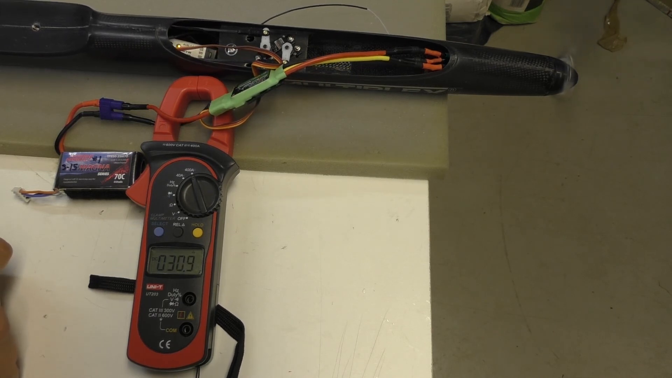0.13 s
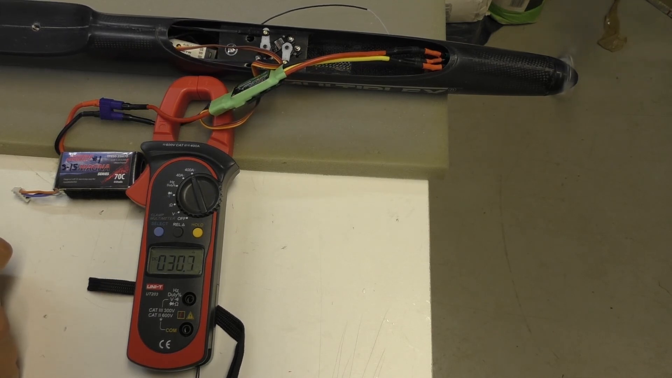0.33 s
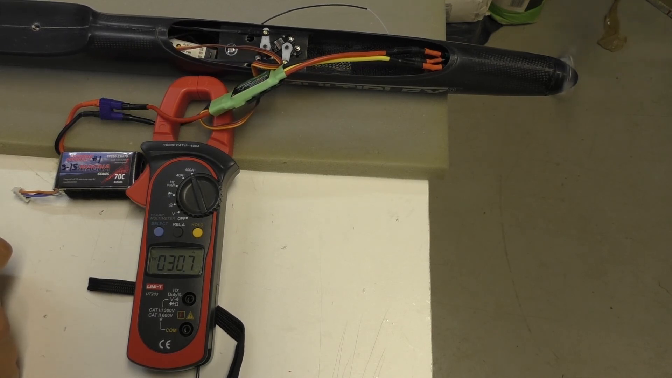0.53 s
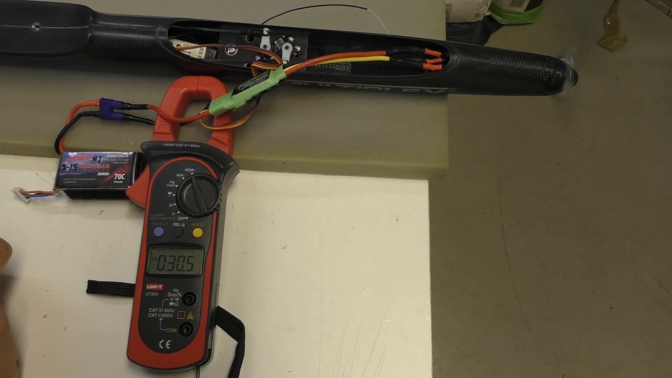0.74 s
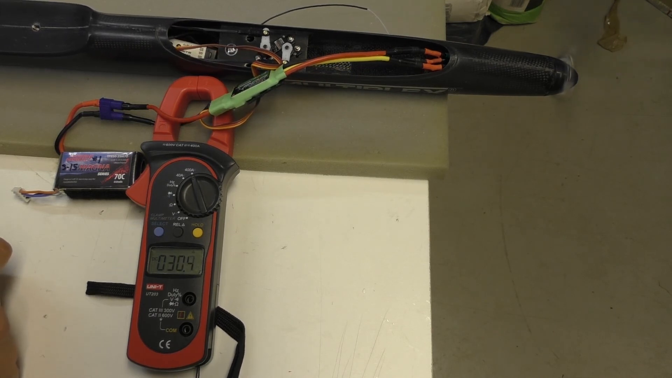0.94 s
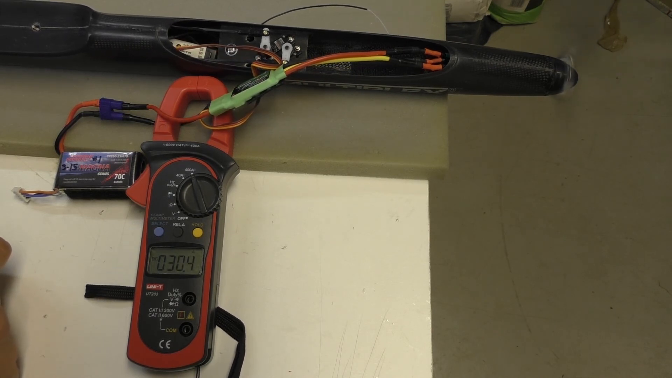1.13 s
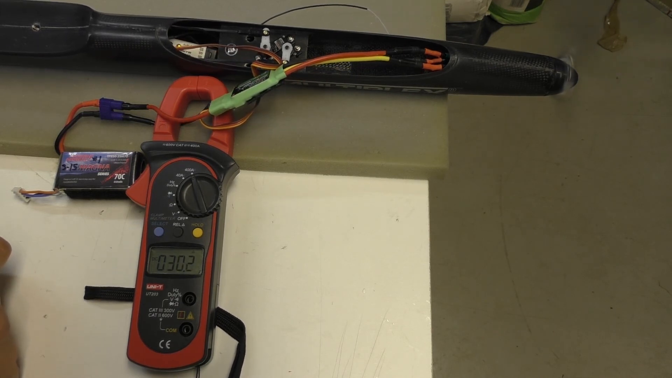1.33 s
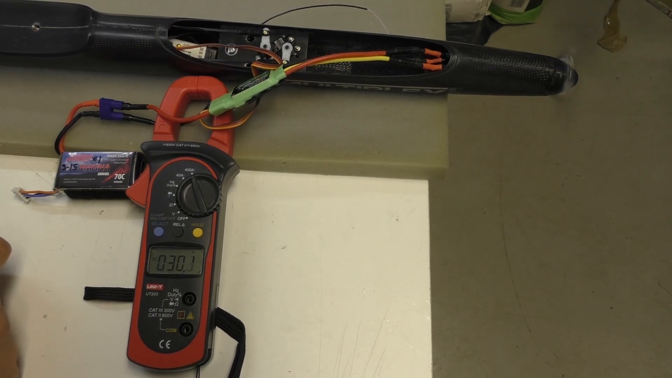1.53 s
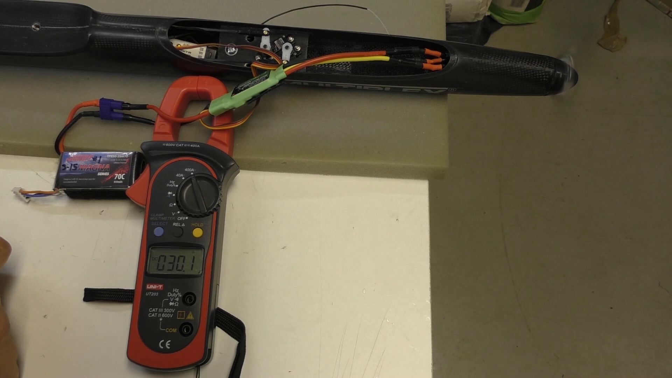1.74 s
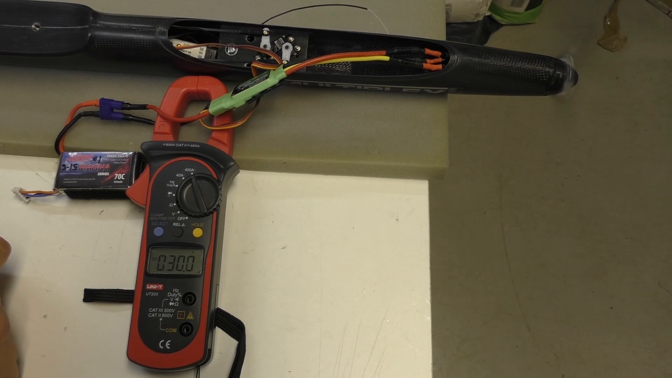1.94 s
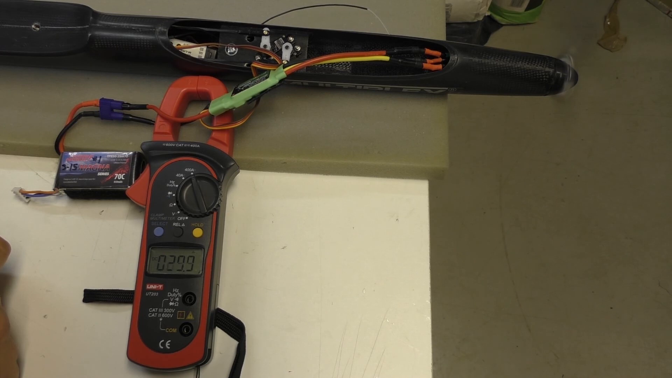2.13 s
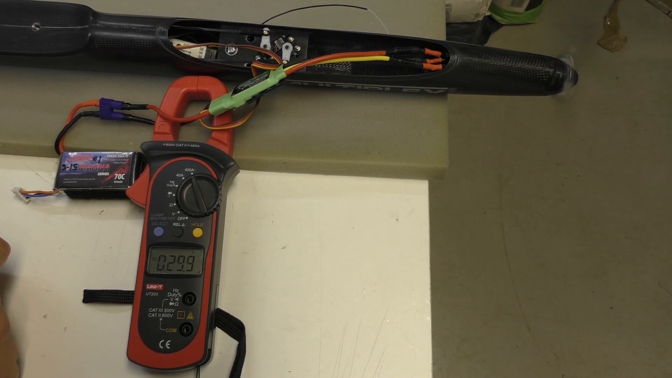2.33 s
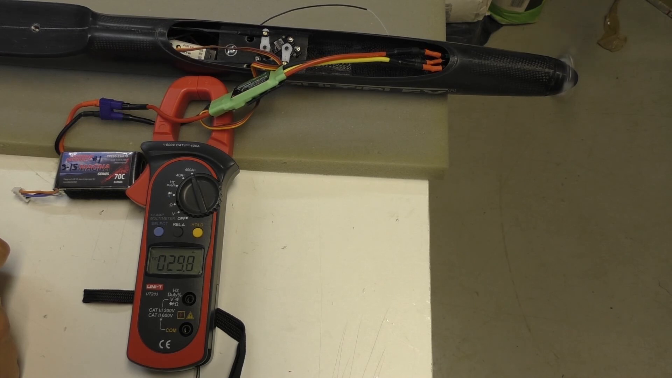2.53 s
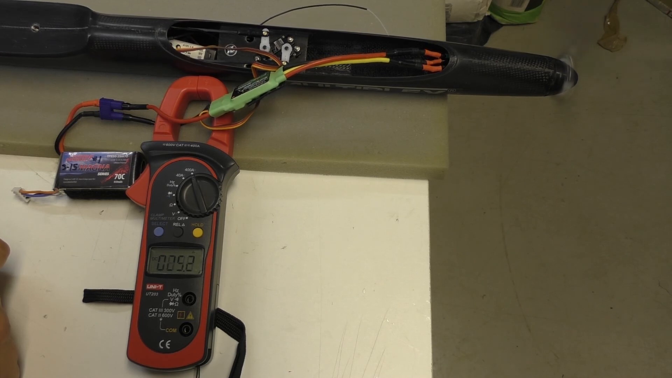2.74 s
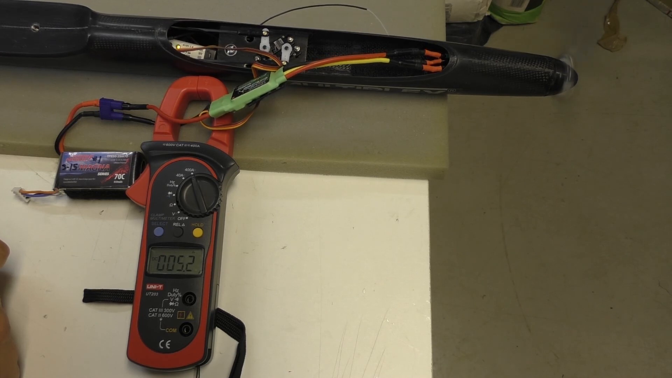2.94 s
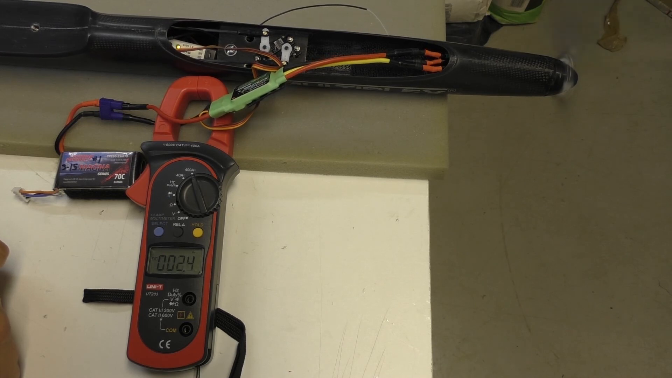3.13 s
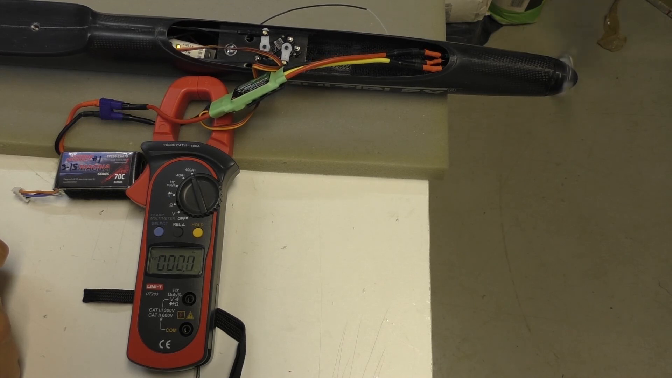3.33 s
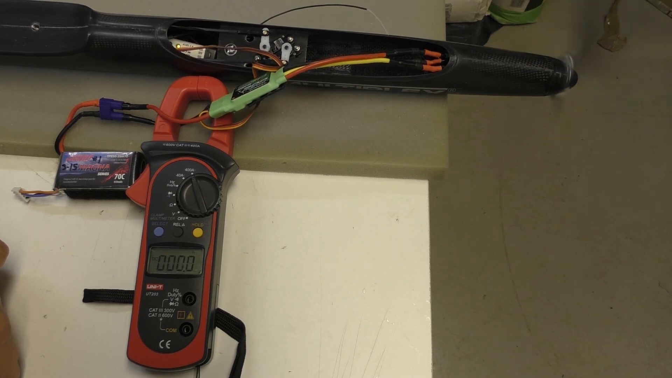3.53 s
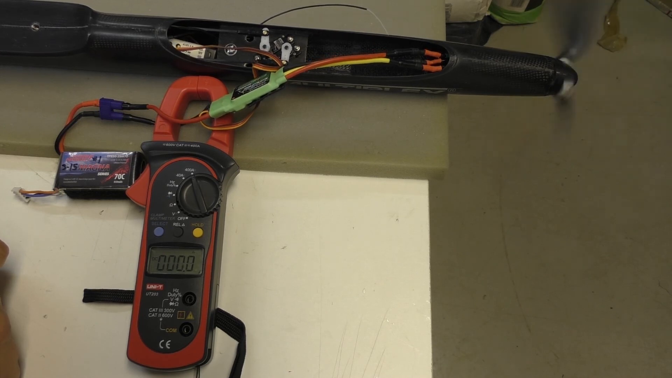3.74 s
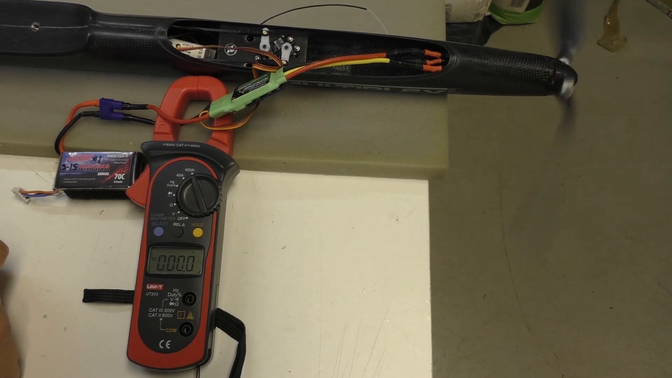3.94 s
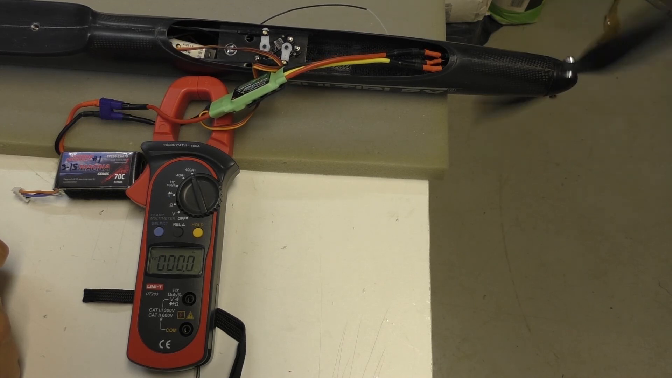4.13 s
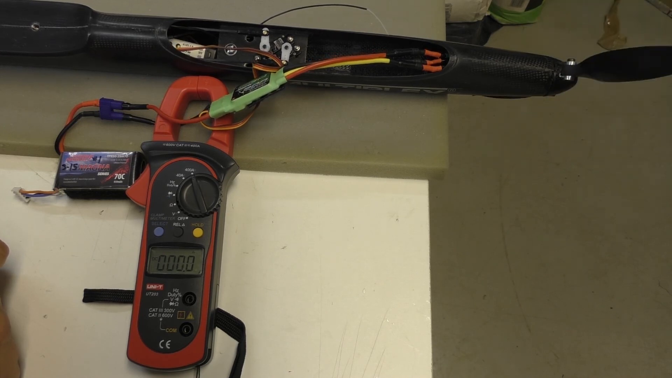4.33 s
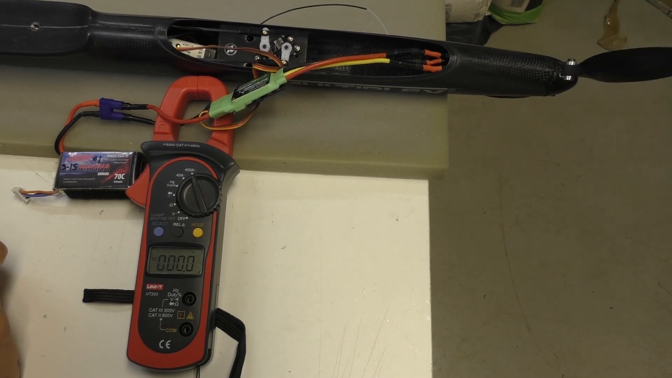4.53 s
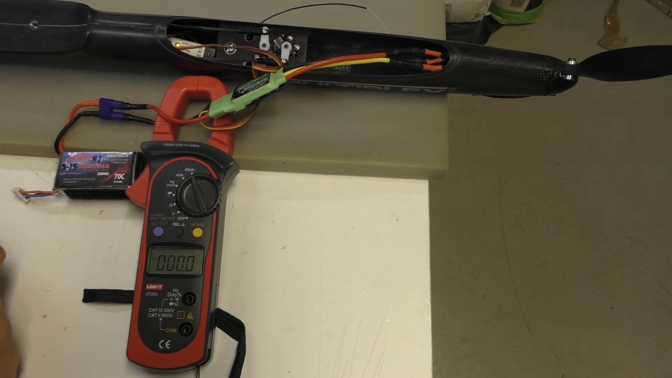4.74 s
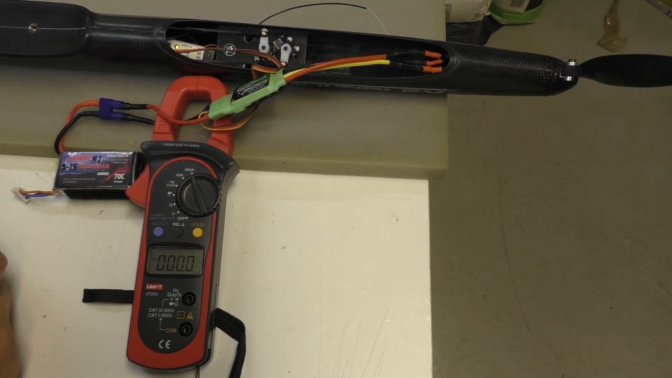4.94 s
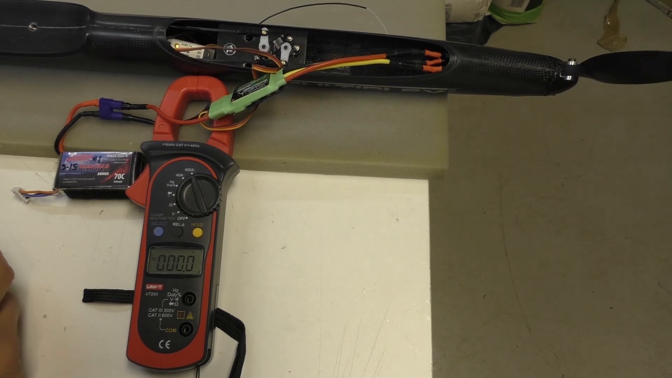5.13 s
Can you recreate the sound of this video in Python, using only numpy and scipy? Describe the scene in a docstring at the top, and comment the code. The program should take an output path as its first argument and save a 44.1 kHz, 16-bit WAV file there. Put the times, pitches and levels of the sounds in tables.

```python
"""Geared propeller motor coasting down

On a bench in a bare room, a small geared electric motor spins a two-blade folding propeller:
shaft-locked sines for blade, motor and gear tones, coloured noise for the rush of air.
The power is cut: three planet gears rattle round a 60-tooth ring, the motor brake sings, the blades flop shut.
A servo then buzzes on its pulse rate, small ticks follow, and the room hums.
The stereo microphone hears the bench in the middle, with echoes and room murmur spread to the sides."""
import sys
import numpy as np
from scipy import signal
from scipy.fft import rfft, irfft, next_fast_len
from scipy.io import wavfile
from scipy.ndimage import map_coordinates

SR = 44100
rng = np.random.default_rng(int(sys.argv[2]) if len(sys.argv) > 2 else 0)


def generate_wav(sig):
    """Save sig (samples, or channels by samples) to the path in sys.argv[1] as 16-bit PCM at SR."""
    pcm = np.round(np.clip(np.atleast_2d(sig).T, -1, 1) * 32767).astype(np.int16)
    wavfile.write(sys.argv[1], SR, pcm)


N = 229482  # samples


def amp(db):
    """dB to gain."""
    return 10 ** (np.asarray(db) / 20)


def unit(x):
    """Scaled to rms 1."""
    return x / np.sqrt(np.mean(x ** 2) + 1e-20)


def along(points, hz):
    """Read (Hz, value) points on a log frequency axis."""
    f, v = np.transpose(points)
    return np.interp(np.log(hz + 1), np.log(f + 1), v)


def curves(rows):
    """One value per sample for each column after the time."""
    s, *cols = np.transpose(rows)
    return [np.interp(np.arange(N) / SR, s, c) for c in cols]


def wobble(rate):
    """A random curve, straight between its knots, rate knots a second."""
    knots = rng.standard_normal(int(N * rate / SR) + 4)
    return map_coordinates(knots, [np.arange(N) * rate / SR], order=1)


def filtered(x, response):
    """x times a complex response of frequency."""
    m = next_fast_len(N + SR // 2)
    spectrum = rfft(x, m) * response(np.fft.rfftfreq(m, 1 / SR))
    return irfft(spectrum, m)[..., :N]


def noise(spectrum, channels=1):
    """Coloured noise of rms 1."""
    white = rng.standard_normal((channels, N))
    return unit(filtered(white, lambda hz: amp(along(spectrum, hz))))


# The propeller shaft slowing on the bench. Each row: time in seconds, speed in turns per second.
SPEED = [(0.06, 124.78), (1.2, 123.72), (2.3, 122.94), (2.375, 122.3), (2.42, 117.3), (2.58, 83),
         (2.66, 71.46), (2.74, 63.8), (2.98, 48.1), (3.06, 40.6), (3.3, 23.8), (3.62, 12.2), (3.78, 8.7),
         (4.02, 4.4), (4.1, 3.95)]
PASS_S = 3.066  # seconds; the angle counts from here, close to a pass of the first planet


def shaft():
    """Speed falls by ratios between its points; its running sum is the angle in turns."""
    s, speed = np.transpose(SPEED)
    speed = np.exp(np.interp(np.arange(N) / SR, s, np.log(speed)))
    turns = np.cumsum(speed) / SR
    return speed, turns - turns[int(PASS_S * SR)]


def tones(orders, turns, unsteady_db, rate):
    """Sines locked to the shaft, each wavering on its own, silent from turn 6 onward."""
    fast = turns[turns < 6]
    x = 0
    for k, db in orders:
        level = np.sqrt(2) * amp(db + unsteady_db * wobble(rate)[:len(fast)])
        x = x + level * np.sin(2 * np.pi * (k * fast + rng.random()))
    return np.pad(x, (0, N - len(fast)))


# Low shaft-locked tones at full power: blade tones at whole multiples, planet gear and motor tones
# between them, before the bench colours the lowest five and before they waver.
# Each row: multiple of shaft speed, level in dB rms.
LOW_TONES = [(1.0, -43), (2.0, -34), (2.84, -53), (3.84, -68.5), (4.0, -43), (4.53, -65), (5.53, -61),
             (6.0, -60.5), (6.53, -61), (7.53, -85.5), (8.0, -59.5), (10.0, -57), (10.38, -60),
             (10.56, -62.5), (12.0, -60.5), (14.0, -62), (16.0, -58.5), (18.0, -55), (20.0, -68.5),
             (22.0, -62.5), (22.66, -58), (24.0, -57.5)]
# Spectrum of the rush of air and gears. Each row: frequency in Hz, relative density in dB per Hz.
AIR = [(20, -15.5), (70, -9), (180, -5.5), (350, -10), (700, -15.5), (1250, -13.5), (2000, -12.5),
       (5300, -9.5), (7000, -3), (8000, -5.5), (9000, -3.5), (10000, -6.5), (11700, -1.5), (13800, -12.5),
       (15000, -0.5), (15800, -5)]


def propeller(speed, turns):
    """Low shaft-locked tones and air rush die steeply with speed; the rush throbs at each blade."""
    slowing = np.log10(speed / speed[0])  # decades
    lows = tones(LOW_TONES[:2], turns, unsteady_db=0.35, rate=43) * amp(65.6 * slowing)
    middle = tones(LOW_TONES[2:5], turns, unsteady_db=1.5, rate=16) * amp(42 * slowing)
    highs = tones(LOW_TONES[5:], turns, unsteady_db=5.0, rate=25) * amp(78 * slowing)
    throb_db = 0.65 * np.cos(2 * np.pi * turns) + 1.7 * np.cos(4 * np.pi * turns) + 0.4 * wobble(30)
    rush = amp(-29.5 + 38.5 * slowing + throb_db) * noise(AIR)[0]
    return filtered(lows + middle, bench) + highs, rush


BENCH_HZ, BENCH_WIDTH_HZ = 189.7, 57.5
BENCH_DB = 3.5  # resonance against the even response


def bench(f):
    """The bench top booms as a low tone slides through one broad resonance over an even response."""
    damping = 1j * f * BENCH_WIDTH_HZ
    return 1 + amp(BENCH_DB) * damping / (BENCH_HZ ** 2 - f * f + damping)


# Gear whine under load, the tooth rate and its sidebands, before the load level and the wavering.
# Each row: multiple of shaft speed, level in dB rms.
MESH = [(53.47, -55.0), (54.0, -53.0), (54.28, -52.0), (55.0, -49.0), (56.0, -54.0), (57.0, -46.0),
        (57.16, -52.0), (57.47, -49.0), (58.0, -32.0), (59.0, -37.0), (60.0, -51.0), (61.0, -48.0),
        (62.0, -38.0), (64.0, -50.0), (65.0, -55.0), (66.0, -46.0), (67.0, -46.0), (68.0, -51.0),
        (69.0, -53.0), (71.0, -52.0), (72.47, -45.0), (74.0, -54.0), (75.0, -53.0), (77.0, -54.0),
        (81.0, -55.0), (82.0, -54.0), (83.0, -55.0), (85.0, -55.0), (87.0, -55.0), (117.0, -51.0),
        (119.0, -55.0), (120.0, -50.0), (122.0, -50.0), (123.0, -52.0)]
# Load on the teeth while the power is on. Each row: time in seconds, whine level in dB.
LOAD = [(.55, -0.5), (1, 3), (1.4, 0.5), (2.35, 0.5)]
# Harmonics of the unloaded teeth. Each row: multiple of tooth rate, relative level in dB.
TEETH = [(1, 6.5), (2, 3.5), (3, 4.5), (4, 3.5), (5, 0), (6, 2), (7, -1.5), (8, -7), (9, 1.5)]
# Each planet passes the loud side once a turn. Each row: share of a turn, swell in dB before speed scales it.
PLANETS = [(-.02, 16.5), (.33, 14.5), (.68, -1)]
TEETH_PER_TURN = 60
CUT_S, UNLOAD_DB_PER_S = 2.39, 350  # the torque leaves the teeth; how fast the whine dies
BRAKE_MUTES_DB = 2.5  # braking presses the teeth together: their two lowest tones weaken


def gears(speed, turns):
    """Loaded teeth sing clean lines; unloaded they chatter, swelling as each planet comes round."""
    unload_db = UNLOAD_DB_PER_S * np.maximum(np.arange(N) / SR - CUT_S, 0)
    whine = amp(curves(LOAD)[0] - unload_db) * tones(MESH, turns, unsteady_db=2.0, rate=6.5)
    tone_db, grind_db = slack(speed)
    passing = sum(db * bump(turns - at) for at, db in PLANETS)
    swell_db = wobble(25) + np.tanh(speed / 14) * (passing - 5)  # slow teeth drag more evenly
    tooth = TEETH_PER_TURN * turns
    count = np.arange(int(tooth[0]) - 1, int(tooth[-1]) + 2)

    def wander(teeth):
        """A random curve with a new value every few teeth."""
        return np.interp(tooth / teeth, count, rng.standard_normal(len(count)))

    # Backlash scatters the contacts, more when slow.
    scatter = (.012 + .22 / speed) * wander(1) + .035 * wander(5)
    tooth = tooth + scatter
    chatter, muted_db = 0, BRAKE_MUTES_DB * braking()
    for k, db in TEETH:
        sharp_db = min(k / 3 + .15, 1) * swell_db + 2.2 * wander(12)  # overtones follow the swell most
        audible = k * TEETH_PER_TURN * speed < SR * .4  # avoids aliasing
        level = audible * amp(db + sharp_db - (k < 3) * muted_db)
        chatter = chatter + level * np.sin(2 * np.pi * k * tooth + 1.3 * wander(7))
    grind = rng.standard_normal(N) * (1 + 0.36 * np.cos(2 * np.pi * tooth))  # scraping at each contact
    rattle = amp(tone_db) * chatter + amp(0.39 * swell_db + grind_db) * grind
    return whine, filtered(rattle, body)


SLACK_LEAD_S, SLACK_DB_PER_S = .04, 301  # scraping leads the tooth tone; how fast both come up
COAST_SPEED = 60  # turns per s at and above which the next levels hold
CHATTER_DB, CHATTER_DB_PER_DECADE = -36.5, 11  # tooth tone of the unloaded gears, softer as they slow
GRIND_DB, GRIND_DB_PER_DECADE = -34.5, 4.5  # their scraping hardly weakens
SNATCH_S, SNATCH_WIDTH_S, SNATCH_DB = 2.44, 0.11, 6  # the propeller overruns the motor, the teeth slap over
STOP_S, SHUDDER_S, SHUDDER_DB = 4.175, 0.15, 11  # the rattle grows just before the shaft halts
HALT_DB_PER_S = 1400


def slack(speed):
    """Levels of tooth tone and scraping: both follow speed between going slack and the halt."""
    t = np.arange(N) / SR
    slowing = np.minimum(np.log10(speed / COAST_SPEED), 0)
    shudder_db = SHUDDER_DB * np.exp(np.minimum(t - STOP_S, 0) / SHUDDER_S)
    shudder_db = shudder_db - HALT_DB_PER_S * np.maximum(t - STOP_S, 0)
    snatch_db = SNATCH_DB * np.exp(-((t - SNATCH_S) / SNATCH_WIDTH_S) ** 2)

    def before(s):
        """The rise in dB up to time s, 0 afterwards."""
        return SLACK_DB_PER_S * np.minimum(t - s, 0)

    tone_db = CHATTER_DB + CHATTER_DB_PER_DECADE * slowing + snatch_db + before(CUT_S)
    grind_db = GRIND_DB + GRIND_DB_PER_DECADE * slowing - snatch_db + before(CUT_S - SLACK_LEAD_S)
    return tone_db + shudder_db, grind_db + shudder_db


PASS_SKEW = 0.57  # a planet's swell rises faster than it falls


def bump(turns):
    """Once a turn, a lopsided peak of height 1."""
    angle = 2 * np.pi * turns
    return np.exp(4 * (np.cos(angle + PASS_SKEW * (np.cos(angle) - 1)) - 1))


# Resonances of the fuselage tube. Each row: centre in Hz, width in Hz, level in dB.
BODY = [(241, 100, -6.5), (550, 75, -2), (724, 108, -6.5), (1168, 105, -1.5), (2640, 740, -7.5),
        (3810, 384, -1.5), (4800, 870, -8.5), (7040, 670, 2), (8855, 310, 1), (11700, 1340, -0.5),
        (12800, 820, -23)]
EVEN, FADE_HZ = 0.11, 15000  # gain between the resonances; where the top fades


def body(f):
    """The tube's resonances, alternating in sign, over a weak even response; the top fades."""
    modes = 0
    for k, (centre, width, db) in enumerate(BODY):
        damping = 1j * f * width
        modes = modes + (-1) ** k * amp(db) * damping / (centre * centre - f * f + damping)
    return (EVEN + modes) / (1 + (f / FADE_HZ) ** 14)


# Motor tones under braking. Each row: multiple of shaft speed, relative level in dB.
BRAKE_TONE = [(27.5, -14), (55, 0), (110, -3)]
BRAKE_S, BRAKE_RISE_S, BRAKE_DB = 2.97, .05, -39  # the windings brake the motor and sing


def brake(turns):
    """A few motor tones slide down with the shaft until it halts."""
    halt_db = HALT_DB_PER_S * np.maximum(np.arange(N) / SR - STOP_S, 0)
    level = braking() * amp(BRAKE_DB - halt_db)
    song = 0
    for k, db in BRAKE_TONE:
        song = song + amp(db + 3.4 * wobble(22)) * np.sin(2 * np.pi * k * turns + .5 * wobble(30))
    return filtered(level * song, body)


def braking():
    """Share of the brake that is on."""
    return np.clip((np.arange(N) / SR - BRAKE_S) / BRAKE_RISE_S, 0, 1)


# Loose blades knock the hub. Each row: start in seconds, level in dB before the tube colours it,
# rattle's 60 dB decay in seconds, thud in dB against the rattle before a fixed gain of 2.2.
FLOPS = [(3.89, -26.5, 0.035, -11.5), (4.053, -22, 0.029, 1), (4.111, -19.5, 0.038, -2.5),
         (4.155, -19.5, 0.041, -1.5), (4.175, -39, .04, 11.5), (4.2336, -27.5, 0.047, -1),
         (4.244, -31.5, 0.085, -2)]


def blades():
    """Each flop is a thud and a dying burst of rattle into the tube."""
    x, t = np.zeros(N + SR), np.arange(SR // 3) / SR
    for s, db, t60, thud_db in FLOPS:
        rattle = rng.standard_normal(len(t)) * amp(-60 * t / t60)
        thud = amp(thud_db) * 2.2 * np.sin(2 * np.pi * 260 * t) * amp(-60 * t / 0.012)
        x[round(s * SR):][:len(t)] += amp(db) * (rattle + thud)
    return filtered(x[:N], body)


# Servo twitches, and one brief tick just before the second long buzz. Each row: start in seconds,
# length in seconds before an added 4.7 ms, level in dB rms before edges and unevenness.
SERVO = [(4.606, 0.025, -59.5), (4.672, 0.0027, -63), (4.676, 0.019, -60), (4.986, 0.015, -53.5)]
# Servo buzz. Each row: multiple of the pulse rate, relative level in dB.
SERVO_TONE = [(5, -5), (6, -4), (7, 0), (8, -13), (9, -12), (10, -15), (11, -13), (17, -20), (18, -21),
              (20, -24)]
# Dry ticks. Each row: start in seconds, level in dB, ring in Hz,
# frequency in Hz above which the crack is dull (held to 15 kHz).
TICKS = [(4.747, -53, 2940, 4520), (4.7637, -50.5, 4420, 4500), (4.8358, -46.5, 3080, 5930),
         (4.8594, -47.5, 2032, 3030), (4.9568, -51, 9500, 11000), (4.9612, -39, 1490, 3500),
         (4.99, -35, 2310, 8300), (5.028, -43, 2230, 10900), (5.051, -46, 1550, 4500),
         (5.149, -47, 2950, 4030)]
SERVO_HZ = 490  # drive pulses a second
KNOCK_HZ, KNOCK_T60_S, KNOCK_DB = 696, 0.037, -13  # hollow body under each dry tick


def small_sounds():
    """Servo buzzes on harmonics of its pulse rate; each dry tick is a knock, a ring and a noise crack."""
    x, t = np.zeros(N + SR), np.arange(SR // 20) / SR
    buzz = unit(sum(amp(db) * np.sin(2 * np.pi * k * SERVO_HZ * t) for k, db in SERVO_TONE))
    for s, length, db in SERVO:
        uneven = amp(3.5 * wobble(270)[:len(t)])
        edges = np.clip(np.minimum(t, length + 0.0047 - t) / 0.002, 0, 1)
        x[round(s * SR):][:len(t)] += amp(db) * uneven * buzz * edges
    knock = amp(KNOCK_DB - 60 * t / KNOCK_T60_S) * np.sin(2 * np.pi * KNOCK_HZ * t)
    for s, db, hz, dull_hz in TICKS:
        ring = np.sin(2 * np.pi * hz * t) * amp(-60 * t / 0.027)
        lowpass = signal.butter(4, min(dull_hz, 15000), fs=SR)
        crack = unit(signal.lfilter(*lowpass, rng.standard_normal(len(t)))) * amp(-60 * t / .016)
        x[round(s * SR):][:len(t)] += amp(db) * (knock + .4 * ring + .5 * crack)
    return x[:N]


# Echoes from the bare walls. Each row: frequency in Hz, 60 dB decay in seconds.
WALLS = [(200, 0.43), (2000, 0.42), (10000, 0.16)]


def walls(x):
    """Two unrelated noise tails, each frequency dying at its own speed."""
    hz, t, z = signal.stft(rng.standard_normal((2, SR // 2)), SR, nperseg=256)
    decay = amp(-60 * t / along(WALLS, hz)[:, None])
    tail = signal.istft(z * decay, SR, nperseg=256)[1]
    return signal.fftconvolve(x[None], tail / np.linalg.norm(tail[0]), axes=1)[:, :N]


# The room around the microphone, before wavering. Each row: time in seconds, hum in dB rms, murmur in dB rms.
ROOM = [(3.5, -81, -71), (4.25, -60, -62), (4.5, -63, -62.5), (4.95, -54.5, -52.5), (5.07, -56.5, -52.5),
        (5.2, -78, -55.5)]
# Murmur spectrum. Each row: frequency in Hz, relative density in dB per Hz.
MURMUR = [(25, -15), (60, -6), (120, -2), (280, -3.5), (600, -20), (1200, -12.5), (2500, -23.5),
          (4500, -28), (7000, -36), (11000, -32), (14000, -33), (14500, -89.5)]
HUM_HZ = 58.3


def room_tone():
    """A low sine hum in the middle, a wide murmur of separate noise in each channel."""
    hum_db, murmur_db = curves(ROOM)
    hum = np.sqrt(2) * amp(hum_db + 2.0 * wobble(8.1)) * np.sin(2 * np.pi * HUM_HZ * np.arange(N) / SR)
    return hum + amp(murmur_db + 1.8 * wobble(4.9)) * noise(MURMUR, channels=2)


# Stereo spread of the echoes, by frequency: wide in most bands, almost centred near 6.4 kHz.
# Each row: frequency in Hz, gain of the side signal in dB.
SPREAD = [(60, 0.5), (92, -22), (140, -21), (210, -17.5), (330, -6), (500, -19.5), (770, -10.5),
          (1170, -7.5), (1790, -7.5), (2740, -13.5), (4190, -8), (6410, -64.5), (9810, -7.5), (15000, -9.5)]


def scene():
    """Bench sounds sit in the middle; echoes and a delayed copy of the low tones give width."""
    speed, turns = shaft()
    low_tones, rush = propeller(speed, turns)
    whine, rattle = gears(speed, turns)
    small = small_sounds()
    rough = rush + rattle + brake(turns) + blades()
    echo, apart = walls(rough + amp(-3.5) * small)
    side = filtered(apart, lambda hz: amp(along(SPREAD, hz)))
    side = side + amp(-16.5) * np.roll(low_tones, 60)  # delay in samples
    mid = low_tones + whine + rough + small + amp(-6.5) * echo
    return np.array([mid + side, mid - side]) + room_tone()


TOP_HZ = 15800


def record(dry):
    """The microphone's chain passes nothing above its band limit, with a 120 Hz slope below it."""
    return filtered(dry, lambda hz: np.sin(np.pi / 2 * np.clip((TOP_HZ - hz) / 120, 0, 1)) ** 2)


dry = scene()
out = record(dry)
generate_wav(out)
```